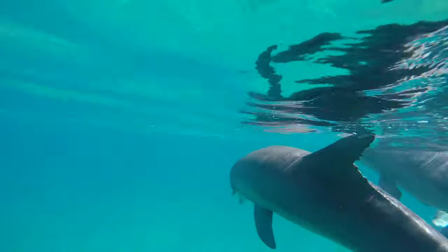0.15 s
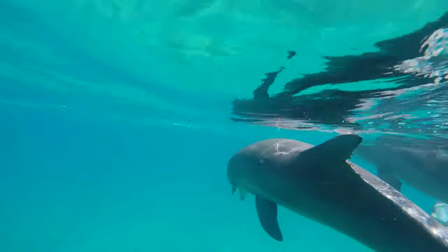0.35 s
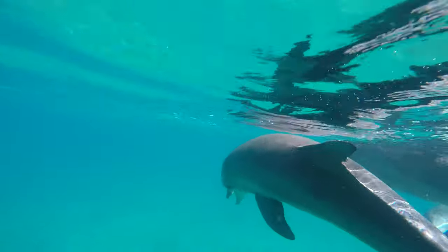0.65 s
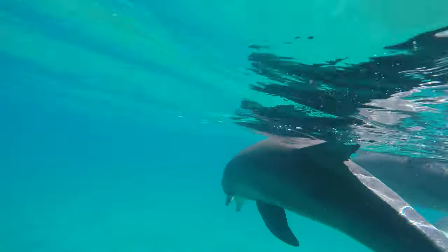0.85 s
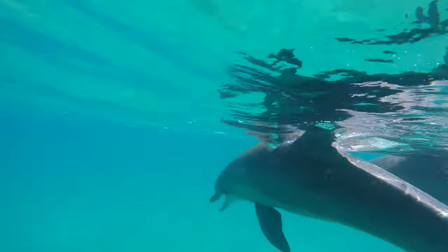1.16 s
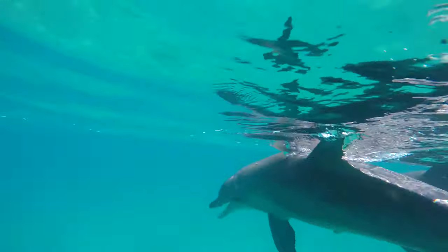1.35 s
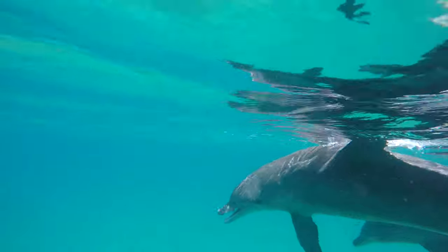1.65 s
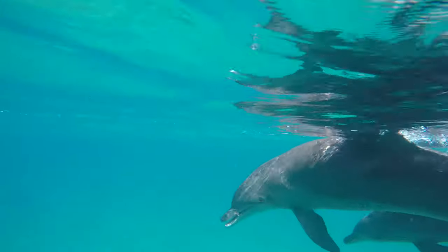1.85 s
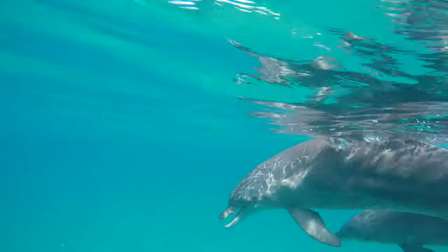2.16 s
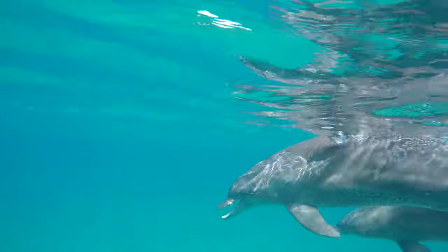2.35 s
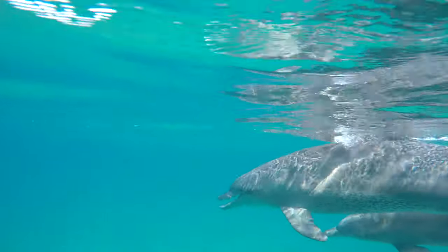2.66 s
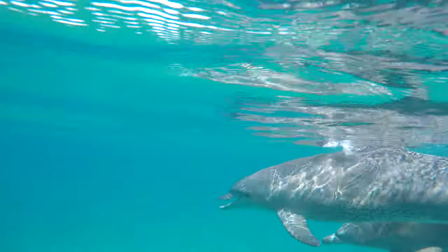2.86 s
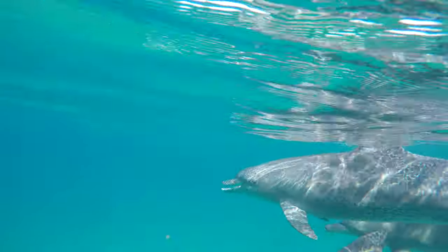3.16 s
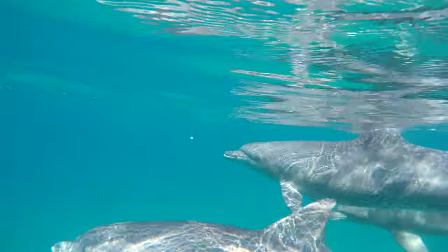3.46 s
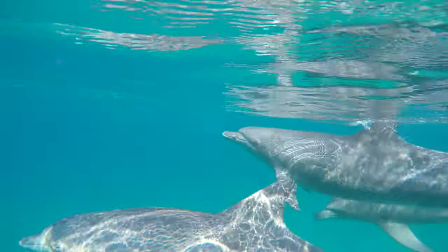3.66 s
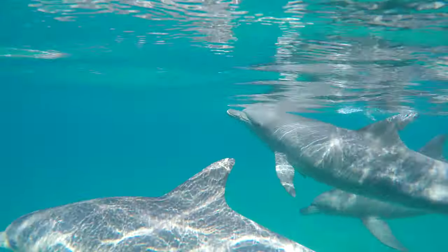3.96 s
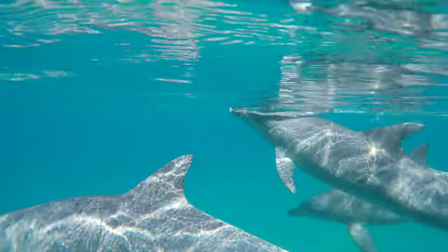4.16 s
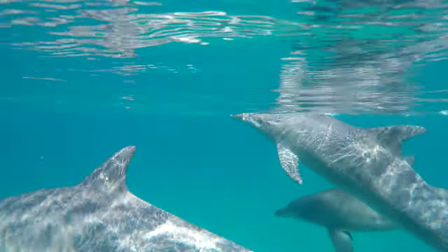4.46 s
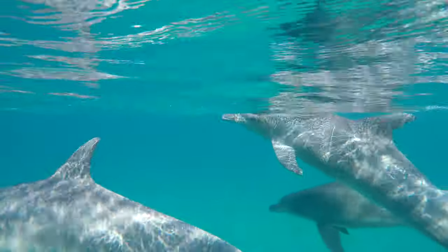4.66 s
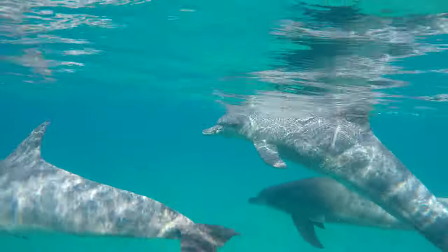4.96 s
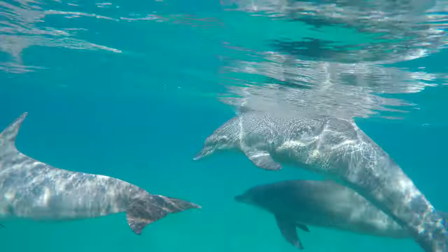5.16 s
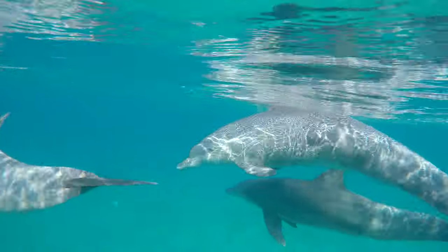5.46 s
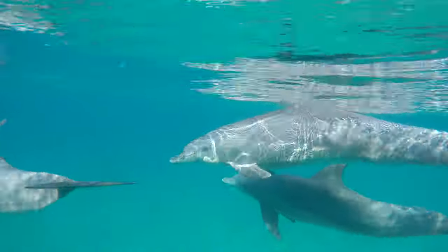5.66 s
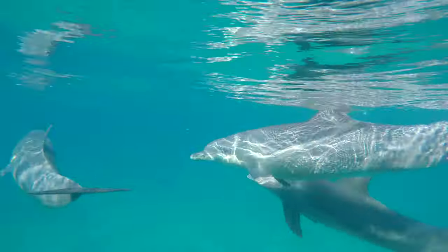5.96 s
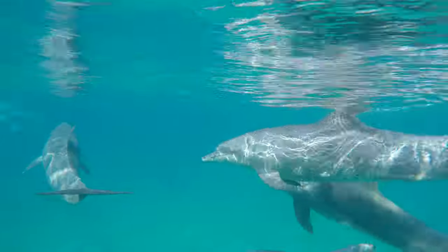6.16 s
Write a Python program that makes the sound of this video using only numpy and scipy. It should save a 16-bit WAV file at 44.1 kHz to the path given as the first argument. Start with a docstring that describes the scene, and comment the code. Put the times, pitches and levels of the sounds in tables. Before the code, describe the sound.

Dolphins click in quick trains underwater over a low rumble, with washing surges, bubbles, a distant creak and one short whistle.

```python
"""A low rumble of water and a swelling train of dolphin clicks, heard from a waterproof camera case
just under the surface of the open sea. Each sonar click is an impulse that rings the modes of the case.
Water washes against it in surges; bubbles, low thumps and sharp snaps sound as damped tones. Later come
a few rasps, a faint swish, a far dolphin's creak, one short whistle and the wobble of a large bubble."""
import sys
import numpy as np
from scipy import signal
from scipy.fft import rfft, irfft
from scipy.io import wavfile
from scipy.ndimage import uniform_filter1d

SR = 44100
rng = np.random.default_rng(int(sys.argv[2]) if len(sys.argv) > 2 else 0)


def wrap_up_sound(samples):
    """Save the sound to the file named by the first command line argument, as 16-bit audio."""
    columns = np.atleast_2d(samples).T
    # keep every value between -1 and 1, then stretch to whole-number steps
    tamed = np.clip(columns, -1, 1)
    steps = np.round(tamed * 32767).astype(np.int16)
    wavfile.write(sys.argv[1], SR, steps)


N = 278712
TIME = np.arange(N) / SR

# wall modes of the case in low, middle and high registers: (frequency [Hz], bandwidth [Hz], gain [dB])
BODY_MODES = [(1653, 47, -5.5), (1846, 98, -5.5), (2353, 77, 7), (2620, 92, 5), (3166, 138, 8.5),
              (3924, 270, 2)]
EDGE_MODES = [(4560, 240, -1.5), (5250, 330, 0.5), (6500, 394, 5.5), (8030, 280, -1), (9500, 450, 1.5)]
TOP_MODES = [(9920, 310, 7), (12770, 370, 13.5), (13600, 810, 10), (14700, 930, 8.5)]
# lower modes of the case as a whole: (frequency [Hz], bandwidth [Hz], gain [dB])
THUD_MODES = [(680, 120, 15), (995, 224, 10), (1700, 210, -0.5)]


def from_db(db):
    """Amplitude ratio of a level in decibels."""
    return 10 ** (np.asarray(db) / 20)


def rms_one(x):
    """Normalisation to unit rms."""
    return x / np.sqrt(np.mean(x ** 2) + 1e-20)


def in_time(rows, at=TIME):
    """Linear interpolation of each column of a curve over time."""
    s, *columns = np.transpose(rows)
    return [np.interp(at, s, c) for c in columns]


def lowpass(x, hz, order=2):
    """A maximally flat low-pass filter."""
    return signal.sosfilt(signal.butter(order, hz, fs=SR, output="sos"), x)


def coloured_noise(spectrum):
    """Spectral shaping of white noise, at unit rms."""
    hz, db = np.transpose(spectrum)
    bins = np.maximum(np.fft.rfftfreq(N, 1 / SR), 1)
    gain = from_db(np.interp(np.log(bins), np.log(hz), db))
    return rms_one(irfft(rfft(rng.standard_normal(N)) * gain, N))


def steady(x, span_s):
    """Division by the running rms evens out swells slower than the span."""
    return x / np.sqrt(uniform_filter1d(x ** 2, max(int(span_s * SR), 2)) + 1e-12)


def resonate(x, modes):
    """Modal superposition: parallel two-pole resonators of alternating sign."""
    out = 0
    for k, (hz, width, db) in enumerate(modes):
        r = np.exp(-np.pi * width / SR)
        zeros = np.array([1, 0, -1]) * (1 - r * r) / 2
        poles = [1, -2 * r * np.cos(2 * np.pi * hz / SR), r * r]
        out = out + (-1) ** k * from_db(db) * signal.lfilter(zeros, poles, x)
    return out


def case_ring(modes):
    """Impulse response of the case, with the energy of 5 ms at unit rms."""
    ring = resonate(signal.unit_impulse(SR // 50), modes)
    return ring * np.sqrt(.005 * SR / np.sum(ring ** 2))


def through(x, response):
    """Convolution with an impulse response."""
    return signal.oaconvolve(x, response)[:N]


def clicks_at(times, db):
    """An impulse train, one sample to a click."""
    out = np.zeros(N)
    out[np.clip((times * SR).astype(int), 0, N - 1)] = from_db(db)
    return out


def glide(rows, octave_db):
    """A gliding tone and its second harmonic; phase is the integral of frequency."""
    hz, db = in_time(rows)
    phase = 2 * np.pi * np.cumsum(hz) / SR
    sounding = (TIME > rows[0][0]) & (TIME < rows[-1][0])
    return np.sqrt(2) * sounding * from_db(db) * (np.sin(phase) + from_db(octave_db) * np.sin(2 * phase))


def flow_rumble(gain_db=-0.3, eddy_hz=14, eddy_db=2.0):
    """Passing eddies modulate the amplitude of the low flow noise at random."""
    # envelope of the flow: (time [s], level [dB])
    envelope = [(0.0, -32.5), (0.52, -30.5), (0.65, -27), (1.19, -30.5), (1.42, -27.5), (1.86, -31),
                (2.16, -27.5), (2.9, -31.5), (3.6, -27.5), (4.15, -33.5), (4.7, -31.5), (5.2, -33.5),
                (5.62, -28.5), (6.3, -31.5)]
    # spectrum of the flow: (frequency [Hz], relative density [dB])
    spectrum = [(5, -51), (16, -4.5), (28, 4.5), (45, -4.5), (70, -5.5), (100, -14), (130, -30), (170, -40),
                (300, -59.5), (1000, -120)]
    level, = in_time(envelope)
    eddies = np.clip(rms_one(lowpass(rng.standard_normal(N), eddy_hz)), -2, 2)
    return from_db(level + gain_db + eddy_db * eddies) * steady(coloured_noise(spectrum), 0.16)


def open_sea(hiss_db=-58.98, snaps_per_s=25, snap_db=-68, snap_edge_db=-10):
    """Ambient noise: a stationary hiss, and sparse far snaps that ring the wall."""
    # spectrum of the hiss: (frequency [Hz], relative density [dB])
    spectrum = [(60, -44), (170, 5), (280, 1), (450, -4.5), (600, 6.5), (720, -1), (1100, -16),
                (1700, -10.5), (2100, -14), (3200, -12), (5400, -17.5), (7600, -22), (9600, -22),
                (14000, -25.5), (16000, -43)]
    snaps = (rng.random(N) < snaps_per_s / SR) * rng.standard_normal(N)
    wall = case_ring(BODY_MODES) + from_db(snap_edge_db) * case_ring(EDGE_MODES)
    return from_db(hiss_db) * coloured_noise(spectrum) + from_db(snap_db) * through(snaps, wall)


def train_times(start, length, count, first_gap, settling, last_gap, braking):
    """Click intervals settle after the start and lengthen towards the end, each by a power law."""
    k = np.arange(1, round(count))
    gaps = 1 + first_gap / k ** settling + last_gap / k[::-1] ** braking
    return start + length * np.append(0, np.cumsum(gaps)) / gaps.sum()


def click_train(times, beam, deep_hz=2900, echo_edge_db=-8, body_lag_s=.0001, off_aim_db=4):
    """Directivity: clicks ring the wall brightest on aim; the surface reflects them inverted and dull."""
    aim_s, sweep_s, body_db, edge_db, top_db, swell_db, deep_db, thud_db, echo_db, echo_s = beam
    gaps = np.gradient(times)
    times = times + rng.normal(0, .0001, len(times))
    off_aim = ((times - aim_s) / sweep_s) ** 2
    swell = swell_db * ((times - times[0]) / (times[-1] - times[0]) - .5)
    edge = edge_db + 0.41 * swell
    top = top_db - off_aim_db * off_aim - 3 * np.log2(gaps / np.median(gaps))  # slow clicks are duller
    # the side from which a train arrives decides how well it drives the deepest modes
    body_modes = [(hz, width, db + deep_db * (hz < deep_hz)) for hz, width, db in BODY_MODES]
    knock = clicks_at(times + body_lag_s, body_db + swell)
    echo = clicks_at(times + body_lag_s + echo_s, echo_db)
    return (through(from_db(thud_db) * knock, case_ring(THUD_MODES))
            + through(knock - echo, case_ring(body_modes))
            + through(clicks_at(times, edge) - from_db(echo_edge_db) * echo, case_ring(EDGE_MODES))
            + through(clicks_at(times, top), case_ring(TOP_MODES)))


def sonar():
    """Echolocation: the near dolphins sweep beams of clicks over the case."""
    # rhythm of each train: (start [s], length [s], clicks [count], extra first gap [settled gaps],
    # settling exponent [1], extra last gap [settled gaps], braking exponent [1])
    rhythms = [(0.0333, 1.3461, 71, 2.624, .229, 3.628, 2.119), (1.6194, .1966, 13, .34, .76, 2.41, 1.19),
               (2.0101, .1663, 13, -.11, 1.46, .7, .82), (2.26, .2947, 19, 3.61, 1.68, 2.27, .92),
               (2.7359, .2462, 13, 1.49, 1.06, 1.38, 1.29), (3.2351, .2356, 15, 1.97, .1, 4.33, 1.45)]
    # beam of each train: (best aim [s], sweep width [s], body [dB], edge [dB], top [dB], swell [dB],
    # deep-mode gain [dB], thud gain [dB], echo [dB], echo delay [s])
    beams = [(.84, 0.77, -71.5, -61.5, -49.5, 42.5, -1.5, -14, -63, 0.0032),
             (1.71, 0.058, -52, -51.5, -49.5, 3.5, -2, -11, -80, .0052),
             (2.1, 0.11, -46, -50, -53, 1, -0.5, -14.5, -55, 0.0019),
             (2.37, 0.12, -44, -51.5, -57, 2.5, 1.5, -28, -84, 0.0034),
             (2.94, 0.07, -47, -53, -54, -1.5, 9.5, -20, -74, 0.00525),
             (3.31, 0.12, -50, -60, -60.5, -2.5, 10.5, -15, -69, 0.0055)]
    return sum(click_train(train_times(*rhythm), beam) for rhythm, beam in zip(rhythms, beams))


def scatter(x, level_db, t60_s):
    """Scattering from the rippled surface and the sea bed adds a faint, dull tail."""
    t = TIME[:SR // 5]
    tail = lowpass(rng.standard_normal(len(t)), 4500, order=1) * from_db(-60 * t / t60_s)
    return x + from_db(level_db) * through(x, tail / np.sqrt(np.sum(tail ** 2)))


def surge_gain(calm_db=-69, range_db=22):
    """Incoherent addition: surges that rise, hold and fall sum in power over the calm."""
    # surges of water: (crest [s], rise [s], hold [s], fall [s], crest level [dB], sag over the hold [dB])
    surges = [(.42, .3, 1, .1, -52.5, 23), (2.138, 0.039, 0.097, 0.25, -25, 5),
              (2.445, 0.3, 0.34, 0.17, -48, -2), (3.863, 0.12, 0.21, 0.31, -45, -0.5),
              (5.829, .06, 0.98, .1, -43.5, -2.5)]
    power = from_db(calm_db) ** 2
    for crest, rise, hold, fall, db, sag_db in surges:
        t = TIME - crest
        flanks = (np.maximum(-t, 0) / rise) ** 2 + np.maximum(t - hold, 0) / fall
        level = db - sag_db * np.clip(t / hold, 0, 1) - range_db * np.minimum(flanks, 10)
        power = power + from_db(level) ** 2
    return np.sqrt(power)


def wash(gain_db=-0.56, grain_db=1.5, grains_per_s=5000, dull_hz=2300, fizz_db=-34, fizz_edge_db=-12):
    """Shot noise: countless small collapses excite the hollow of the case and, faintly, its walls."""
    # cavity resonances: (frequency [Hz], bandwidth [Hz], gain [dB])
    hollow_modes = [(180.6, 42, -10.5), (324, 130, -10.5), (622.2, 24, 7), (704, 112, -15.5),
                    (979, 41, -14), (1005, 163, -22)]
    # wall modes that the fizz excites: (frequency [Hz], bandwidth [Hz], gain [dB])
    fizz_modes = [(1692, 150, 10), (2000, 43, 5.5), (2354, 59, 11), (3210, 460, 0.5), (3930, 170, 0)]
    sizes = from_db(grain_db * np.minimum(rng.exponential(1, N), 4)) * rng.standard_normal(N)
    grains = sizes * (rng.random(N) < grains_per_s / SR) + 1e-18
    hollow = lowpass(resonate(grains, hollow_modes), dull_hz)
    # the case passes little between its hollow and its wall modes
    hollow = signal.lfilter(*signal.iirnotch(1300, 3.0, fs=SR), hollow)
    fizz = rms_one(resonate(grains, fizz_modes) + from_db(fizz_edge_db) * resonate(grains, EDGE_MODES))
    surge = surge_gain()
    return surge * from_db(gain_db) * steady(hollow, 0.053) + surge ** 0.7 * from_db(fizz_db) * fizz


def bubbles_thumps_and_snaps(rise=0.0044, onset_s=0.0031):
    """Bubbles, low thumps and a few sharp snaps, each a damped tone whose pitch rises slightly."""
    # bubbles, thumps and snaps: (time [s], frequency [Hz], level [dB], time to decay by 60 dB [s])
    rings = [(.145, 134, -34, 0.25), (.405, 530, -38, 0.19), (.428, 522, -29.5, 0.049),
             (.724, 2500, -44, 0.027), (.775, 1670, -47, 0.025), (0.795, 101, -23, 0.14),
             (.926, 1740, -45, 0.028), (0.957, 113, -36, 0.26), (1.024, 1940, -45.5, 0.03),
             (1.168, 180, -27.5, 0.035), (1.432, 125, -31, 0.098), (1.8, 117, -28, 0.092),
             (1.962, 147, -13, 0.036), (1.972, 272, -21, 0.039), (2.115, 331, -22.5, 0.047),
             (2.154, 654, -14.5, 0.085), (2.190, 576, -9.5, 0.042), (2.205, 346, -24.5, 0.085),
             (3.545, 123, -29, 0.096), (3.68, 125, -36.5, 0.16), (5.001, 8000, -43, 0.01),
             (5.530, 6460, -42, 0.013), (5.592, 8050, -55, 0.053)]
    out = np.zeros(N)
    for s, hz, db, t60 in rings:
        start = int(s * SR)
        t = TIME[:min(int(2 * t60 * SR), N - start)]
        tone = np.sin(2 * np.pi * hz * t * (1 + rise * t / t60))
        out[start:start + len(t)] += from_db(db - 60 * t / t60) * (1 - np.exp(-t / onset_s)) * tone
    return out


def gurgle(start_s=0.17, end_s=1.15, range_hz=(546, 783), per_s=110, level_db=-53, spread_db=3,
           ring_cycles=36, sizes=12):
    """Small bubbles break off at random in the first surge; size sets each one's resonant frequency."""
    swell = np.sin(np.pi * np.clip((TIME - start_s) / (end_s - start_s), 0, 1))
    born = (rng.random(N) < per_s / SR) * from_db(level_db + spread_db * rng.standard_normal(N)) * swell
    size = rng.integers(0, sizes, N)
    t = TIME[:SR // 10]
    rings = [np.sin(2 * np.pi * hz * t) * from_db(-60 * t * hz / ring_cycles)
             for hz in np.geomspace(*range_hz, sizes)]
    return sum(through(born * (size == k), ring) for k, ring in enumerate(rings))


def rasps(attack_s=0.002, tail_s=0.0082, thud_db=-3, top_db=-10, clicks_per_s=4200, knock_db=-4):
    """Forced vibration: clicks too close to tell apart shake the whole case for milliseconds."""
    # dense bursts of clicks: (time [s], level [dB], length [s], treble gain [dB])
    pulses = [(3.902, -51, .003, -7), (3.937, -48, .003, -6), (3.975, -44.5, 0.011, -14.5),
              (4.015, -32.5, 0.0047, -12), (4.068, -36, 0.0048, -20), (4.104, -49, 0.0036, -26),
              (4.135, -50.5, 0.0018, -24)]
    low, high = np.zeros(N), np.zeros(N)
    for s, db, length, treble_db in pulses:
        shape = np.clip((TIME - s) / attack_s, 0, 1) * np.exp(-np.maximum(TIME - s - length, 0) / tail_s)
        low += from_db(db) * shape
        high += from_db(db + treble_db) * shape ** 2  # the treble dies twice as fast
    burst = rng.standard_normal(N) * (rng.random(N) < clicks_per_s / SR)
    burst = np.diff(burst, prepend=0)  # each click is a push and a pull, weak in the bass
    thud, body, edge, top = [rms_one(resonate(burst, modes))
                             for modes in (THUD_MODES, BODY_MODES, EDGE_MODES, TOP_MODES)]
    # a long burst builds up the lowest wall modes more than a single click does
    knock = rms_one(resonate(burst, [(1696, 50, 22.6), (2550, 520, 7.7)]))
    shake = steady(body + from_db(thud_db) * thud + from_db(knock_db) * knock, 0.015)
    return low * shake + high * (edge + from_db(top_db) * top)


def swish(half_width_hz=340):
    """A faint swish of water: modulation by noise spreads a falling tone into a narrow band."""
    # path of the band: (time [s], centre frequency [Hz], level [dB])
    contour = [(4.29, 2195, -73.5), (4.36, 2010, -66), (4.41, 1830, -67), (4.47, 1400, -66),
               (4.55, 1135, -73)]
    flutter = lowpass(rng.standard_normal(N), half_width_hz)
    return rms_one(flutter) * glide(contour, octave_db=-16)


def creak(start_s=5.082, count=71, buzz_db=-56.0, buzz_hz=775, buzz_width_hz=90, fade_db_per_s=18):
    """A far dolphin's dull clicks each excite a chirp and a low resonance, whose buzz fades."""
    # pace of the clicks: (time [s], gap [s])
    pace = [(5.08, .01458), (5.3, .01405), (5.6, .01472), (5.85, .01959), (6.0, .02266), (6.14, .02995),
            (6.28, .01907)]
    # the far dolphin's beam: columns as for the beams in sonar()
    beam = (8, -3, -59.5, -68.5, -67, 0.5, 5.5, -8.5, -43, 1.6)
    times = [start_s]
    while len(times) < count:
        times.append(times[-1] + in_time(pace, times[-1])[0])
    times = np.array(times)
    fading_clicks = clicks_at(times, buzz_db - fade_db_per_s * (times - start_s))
    buzz = through(fading_clicks, case_ring([(buzz_hz, buzz_width_hz, 0)]))
    return buzz + chirps(times) + click_train(times, beam)


def chirps(times, start_hz=2296, sweep_hz_per_s=73000, length_s=0.0061, level_db=-59.5,
           climb_hz_per_s=174, swell_db_per_s=8):
    """A linear frequency sweep follows each click, higher and louder as the creak goes on."""
    out = np.zeros(N)
    t = TIME[:int(length_s * SR)]
    window = np.sin(np.pi * t / length_s)
    for s in times:
        age, start = s - times[0], int(s * SR)
        phase = 2 * np.pi * t * (start_hz + climb_hz_per_s * age + sweep_hz_per_s * t / 2)
        out[start:start + len(t)] += from_db(level_db + swell_db_per_s * age) * window * np.sin(phase)
    return out


def whistle():
    """A dolphin's short whistle is a frequency-modulated tone that climbs."""
    # path of the whistle: (time [s], frequency [Hz], level [dB])
    contour = [(5.162, 4560, -74), (5.172, 4580, -65), (5.183, 4510, -63), (5.191, 4640, -54.5),
               (5.208, 4680, -68), (5.228, 4820, -59), (5.243, 4980, -68), (5.254, 5050, -77)]
    return glide(contour, octave_db=-15)


def wobbling_bubble():
    """The resonant frequency of one large bubble wavers as it wobbles upward."""
    # path of the resonance: (time [s], frequency [Hz], level [dB])
    contour = [(5.631, 564, -65), (5.634, 555, -37.5), (5.645, 566, -41.5), (5.668, 694, -48),
               (5.681, 700, -51), (5.693, 597, -42.5), (5.708, 560, -51), (5.735, 630, -61),
               (5.75, 636, -70)]
    return glide(contour, octave_db=-49)


def scene():
    """Superposition of dolphins and water in one channel."""
    dolphins = scatter(sonar() + creak() + rasps() + whistle(), level_db=-14.5, t60_s=0.038)
    water = flow_rumble() + open_sea() + wash() + gurgle()
    water += bubbles_thumps_and_snaps() + swish() + wobbling_bubble()
    return (dolphins + water)[None]


def record(dry, cutoff_hz=16100):
    """Band limiting: an elliptic low-pass cuts the highest treble steeply."""
    return signal.sosfilt(signal.ellip(10, .2, 80, cutoff_hz, fs=SR, output="sos"), dry)


dry = scene()
out = record(dry)
wrap_up_sound(out)
```